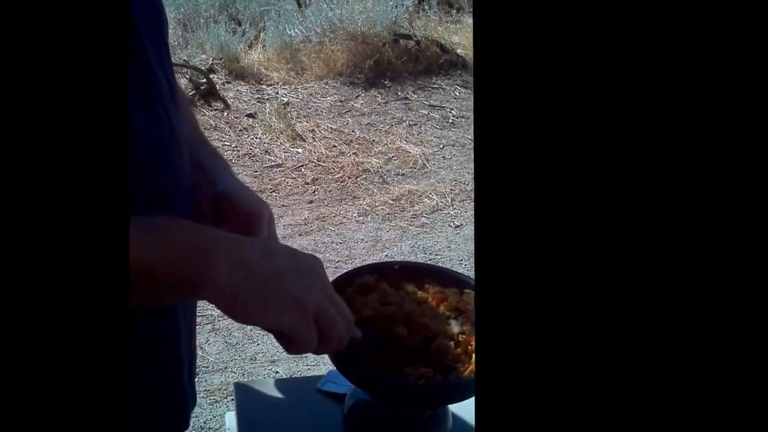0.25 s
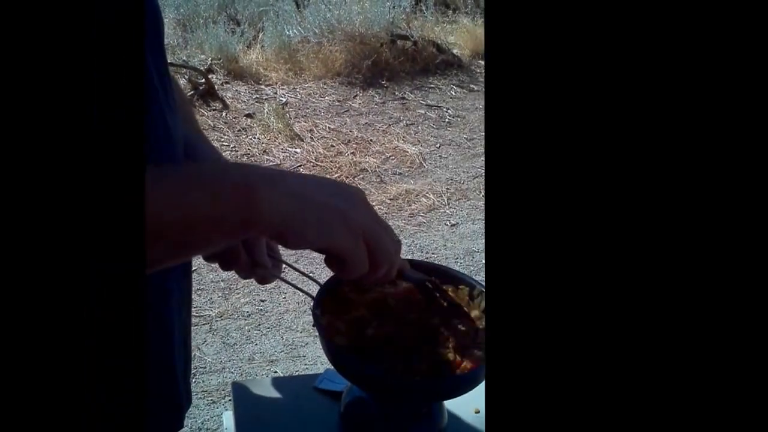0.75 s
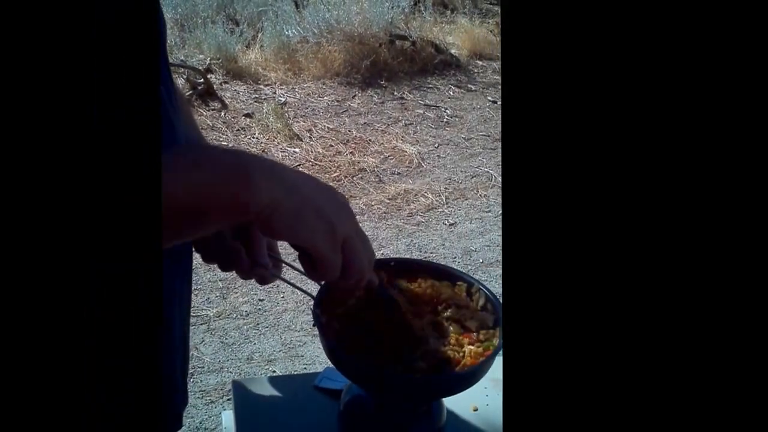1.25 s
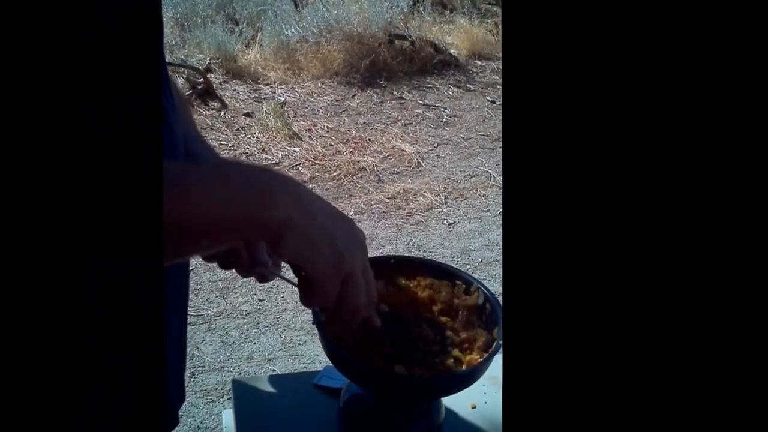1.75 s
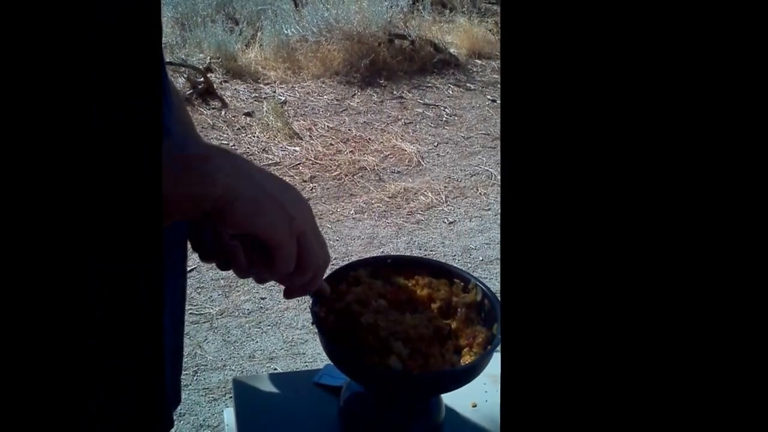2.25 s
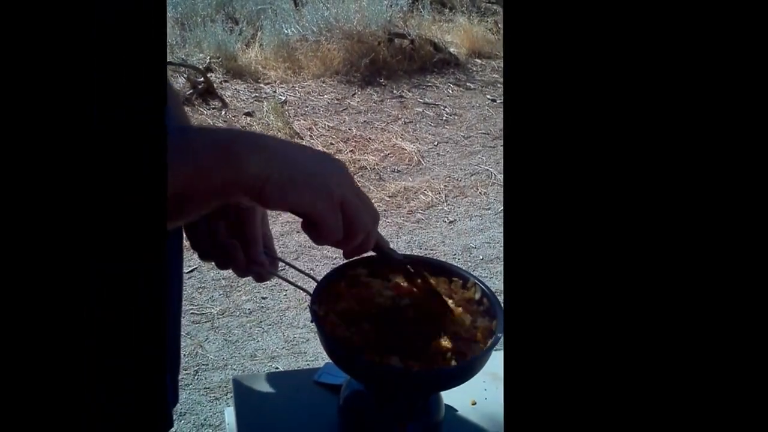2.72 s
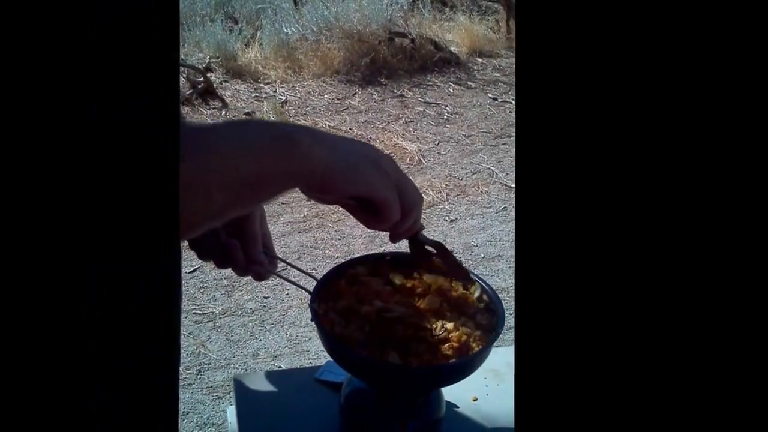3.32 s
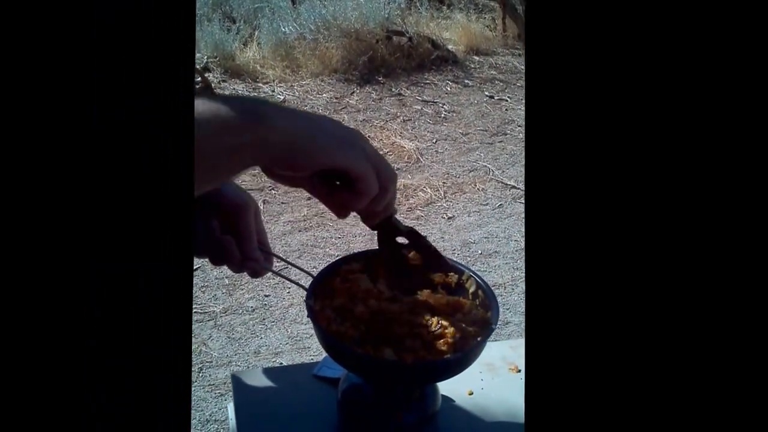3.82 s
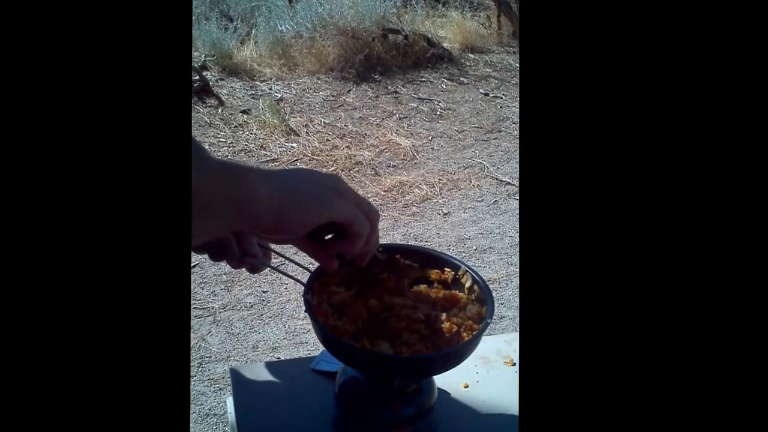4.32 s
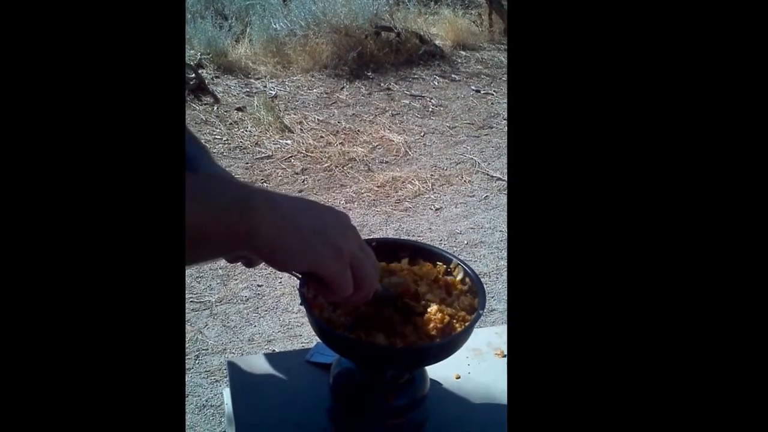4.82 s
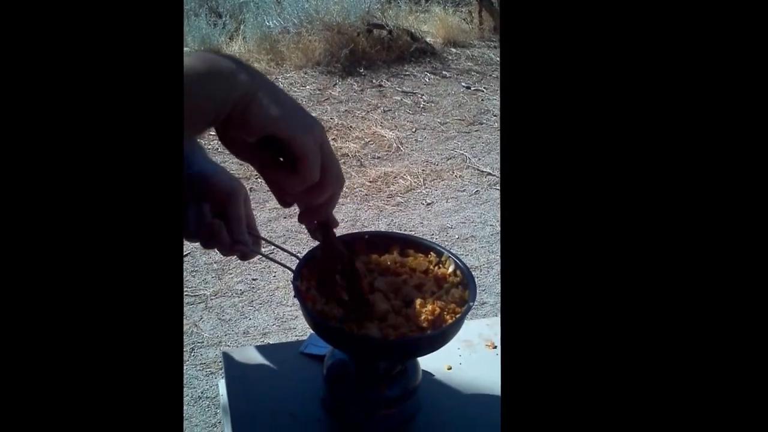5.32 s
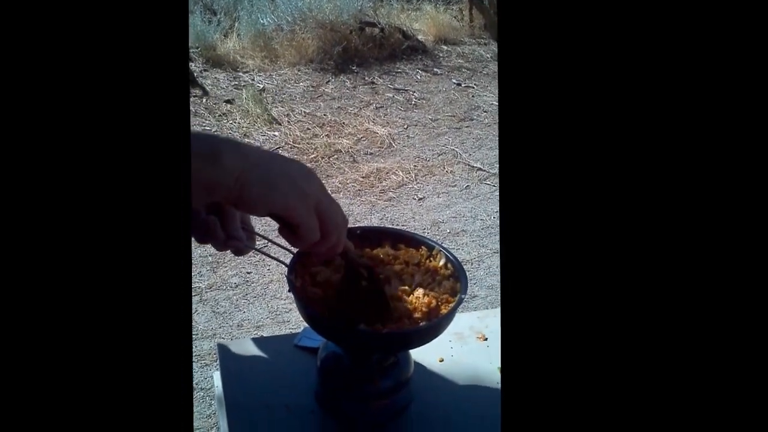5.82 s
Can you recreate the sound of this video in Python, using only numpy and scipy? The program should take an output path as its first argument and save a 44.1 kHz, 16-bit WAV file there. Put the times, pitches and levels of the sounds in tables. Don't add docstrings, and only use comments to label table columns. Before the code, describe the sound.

Throughout about six seconds, a gas camp burner roars steadily under a pan, with airy jet hiss and fine crackling sizzle that waver slightly as food is stirred. Two dull, prominent fat pops come at 0.1 and 0.2 s, then sharp little spits around 0.4-0.9 s. Spoon ticks are short, bright and irregular; knocks on the pan floor fall near 0.9, 1.1, 1.6 and 3.2 s. A quick cluster of ticks comes at 2.6 s, and the hardest knock at 3.6 s leads into a brief rasping scrape. Low wind buffets burst around 1.75 s, 2.2-2.6 s and most densely 2.7-3.4 s, with another near 4.95 s, heavier on one side. Fat spits again around 3.8-4.2 s; crackle grows livelier towards the end, with faint knocks and catches from 5.5 s and a clear tick at 6.0 s. Close, dry outdoor stereo, hollow, comb-like and slightly grainy.

```python
import sys
import numpy as np
from scipy import signal
from scipy.io import wavfile
from scipy.ndimage import uniform_filter1d

SR = 44100
rng = np.random.default_rng(int(sys.argv[2]) if len(sys.argv) > 2 else 0)


def unload_audio(sound):
    columns = np.transpose(np.atleast_2d(sound))
    steps = np.round(np.clip(columns, -1, 1) * 32767)
    wavfile.write(sys.argv[1], SR, steps.astype(np.int16))


def volts_from_decibels(level):
    exponent = np.asarray(level, float) / 20
    return 10 ** exponent


N = 267113


def read(points, hz, order=1):
    columns = np.transpose(points)
    return np.interp(np.log(hz + 1), np.log(columns[0] + 1), columns[order])


def at_time(points, t):
    return np.interp(t, *np.transpose(points))


def evened(x):
    return x / np.sqrt(np.mean(x ** 2) + 1e-20)


def add(mix, s, sound):
    part = mix[max(round(s * SR), 0):][:len(sound)]
    part += sound[:len(part)]


def band(x, hz, width_hz):
    return signal.lfilter(*signal.iirpeak(hz, hz / width_hz, SR), x)


# (time [s], rumble level [dB])
BREEZE = [(0, -64), (.4, -68), (.9, -55.5), (1.3, -56), (1.55, -46), (1.78, -40.5), (1.92, -50),
          (2.3, -46.5), (2.7, -39.5), (3.0, -40.5), (3.4, -41), (3.6, -47.5), (3.9, -52), (4.4, -46),
          (4.95, -50.5), (5.35, -65.5), (5.8, -49.5), (6.06, -56.5)]


def small_eddies(count=150, gap_s=0.04):
    late, size, tone = rng.random((count, 3)).T
    s = (np.arange(count) + 2 * late) * gap_s
    db = at_time(BREEZE, s) + 12.5 + 7 * (size - 0.5)
    hz = 135 + 46 * (tone - 0.5)
    return list(zip(s + 0.04, db, hz))


# (time [s], peak level [dB], frequency [Hz])
BUFFETS = [(1.51, -30, 130), (1.739, -21, 135), (1.751, -16.5, 123), (1.765, -25, 200), (1.825, -20, 167),
           (2.203, -27.5, 144), (2.293, -20, 176), (2.454, -26.5, 135), (2.553, -25, 137),
           (2.709, -23, 175), (2.75, -17.5, 140), (2.839, -26, 147), (2.896, -21, 164), (2.92, -20.4, 134),
           (2.954, -23, 135), (2.976, -23, 150), (3.016, -23.5, 148), (3.062, -21.5, 130),
           (3.138, -15, 171), (3.154, -24.5, 188), (3.168, -18, 140), (3.18, -22, 150), (3.243, -26, 160),
           (3.411, -21, 130), (3.432, -24, 150), (3.613, -28, 161), (4.319, -27.5, 125), (4.68, -26.5, 133),
           (4.928, -28.5, 130), (4.959, -20, 146)]


def wind(lumpy_db=0.5, cycles=0.65, rumble_db=-2.0):
    t = np.arange(N) / SR
    noise, lumps = rng.standard_normal((N, 2)).T
    lumps = evened(uniform_filter1d(uniform_filter1d(lumps, 700), 700))
    rumble = band(band(noise, 120, 170), 150, 260) * volts_from_decibels(lumpy_db * lumps)
    out = evened(rumble) * volts_from_decibels(at_time(BREEZE, t) + rumble_db)

    u = np.arange(-1500, 1500) / SR
    eddies = BUFFETS + small_eddies()
    for (s, db, hz), (turn, wide) in zip(eddies, rng.random((len(eddies), 2))):
        length_s = cycles * (0.51 + 0.87 * wide) / hz
        swell = np.exp(-(u / length_s) ** 2)
        add(out, s + u[0], volts_from_decibels(db) * swell * np.cos(2 * np.pi * (hz * u + turn)))
    return out


def ticks(events, hz, width_hz, t60, gain_db, second):
    out = np.zeros((2, N))
    u = np.arange(600) / SR
    puffs = rng.standard_normal((len(events), 2, len(u) + 1))
    for (s, db), puff in zip(events, puffs):
        tone_hz = hz * (1 + 0.016 * puff[0, 0])
        fading = puff[:, 1:] * volts_from_decibels(-60 * u / t60)
        ring = band(band(fading, tone_hz, width_hz), tone_hz, width_hz)
        ring *= volts_from_decibels(db + gain_db) / abs(ring[0]).max()
        add(out[0], s - 0.001, ring[0])
        add(out[1], s - 0.001, second * ring[0] + 0.47 * ring[1])
    return out


# (time [s], level [dB])
SPOON = [(0.363, -38.4), (0.382, -40.7), (0.472, -40.2), (0.593, -40.4), (0.617, -42.6), (1.295, -39.8),
         (1.473, -38.1), (2.144, -43.1), (2.18, -43.3), (2.629, -34.5), (2.638, -38.1), (2.646, -36.3),
         (2.668, -39.8), (3.033, -36.3), (3.182, -39.4), (3.413, -40.3), (3.635, -35.6), (3.765, -38.7),
         (3.83, -41.9), (3.895, -40.8), (4.07, -41.6), (4.71, -42.4), (4.845, -38.5), (5.124, -45.7),
         (5.566, -40.0), (5.701, -44.1), (5.837, -44.0), (5.893, -40.4), (6.016, -32.3)]


def spoon_ticks():
    return ticks(SPOON, hz=3200, width_hz=1600, t60=0.022, gain_db=0.5, second=-0.25)


# (time [s], level [dB])
KNOCKS = [
    (0.91, -36),
    (1.102, -34.5),
    (1.614, -37),
    (2.333, -64),
    (3.181, -36.5),
    (3.628, -40),
    (3.635, -31),
    (5.501, -43),
    (5.902, -42),
    (6.056, -40),
]


def floor_knocks():
    return ticks(KNOCKS, hz=1575, width_hz=2400, t60=0.058, gain_db=-3.0, second=0.61)


# (time [s], level [dB])
SCRAPES = [
    (1.613, -38),
    (3.66, -38),
    (3.68, -36),
    (3.705, -35),
    (3.713, -40),
    (3.722, -36.5),
    (5.525, -39),
    (5.94, -40.5),
]


def scrapes():
    return ticks(SCRAPES, hz=4260, width_hz=1700, t60=0.018, gain_db=0.1, second=0.22)


# (time [s], level [dB])
SPITS = [(0.015, -53), (0.027, -46), (0.43, -36), (0.529, -35), (0.713, -56), (0.786, -39), (0.854, -33.5),
         (0.902, -38.5), (1.265, -55), (2.04, -42), (2.321, -51), (2.364, -36), (3.765, -38),
         (3.895, -36.5), (3.963, -36), (4.202, -36), (5.491, -43), (5.827, -37), (5.843, -39), (5.909, -36)]


def fat_spits():
    return ticks(SPITS, hz=8300, width_hz=11000, t60=0.02, gain_db=-3, second=0.3)


# (time [s], level [dB])
POPS = [
    (.125, -27),
    (.211, -29.5),
]


def fat_pops():
    return ticks(POPS, hz=5600, width_hz=5000, t60=0.012, gain_db=0, second=0.25)


def crackle(per_s, spread_db):
    size = volts_from_decibels(spread_db * np.minimum(rng.exponential(1, N), 4))
    happens = rng.random(N) < per_s / SR
    return evened(size * rng.standard_normal(N) * happens)


def grainy_noise(grain=0.16):
    smooth = rng.standard_normal((2, N))
    grains = np.array([crackle(per_s=2000, spread_db=3.5), crackle(per_s=2000, spread_db=3.5)])
    hz, t, rush = signal.stft(smooth, SR, nperseg=1024, noverlap=768)
    bursts = signal.stft(grains, SR, nperseg=1024, noverlap=768)[2]
    share = np.clip(grain * np.sqrt(hz / 9000), 0, 0.9)[:, None]
    return hz, t, np.sqrt(1 - share) * rush + np.sqrt(share) * bursts


STOVE_HZ = (800, 2600, 4800, 6000, 7800, 9500)
# (time [s], stirring level [dB])
STIRRING = [(0, 2.5), (.125, 7), (.3, 2), (.55, .5), (1.3, .3), (1.6, 1), (1.875, 2), (2.05, -2.5),
            (2.375, 1.5), (2.5, -0.5), (3.3, 1), (3.68, 5), (3.875, -0.5), (4.375, 3.5), (4.65, -0.2),
            (5.2, -3), (5.65, -1), (6.06, -0.5)]
# (time [s], exposure level [dB])
EXPOSURE = [(0, 1.5), (.625, 1.5), (1, -0.5), (1.375, 0.5), (1.5, 2.5), (2.3, 1), (2.55, 0), (3, 1.5),
            (3.125, 3), (3.26, -0.5), (3.5, 3.5), (3.75, 0.5), (3.875, -1.5), (4.4, 0.4), (4.85, -4.5),
            (5.2, 0), (5.5, -4), (5.8, -2)]
# (time [s], level [dB])
FAT = [
    (0, -2),
    (.4, 0.5),
    (2, -0.5),
    (3, 1),
    (3.9, 1),
    (4.4, 0.5),
    (4.8, 2),
    (5.5, 2.5),
    (5.7, 2),
    (6.06, 3.5),
]


def stove_level_db(hz, t, patchy_db=1.5, flicker_db=0.5, flutter_db=0.65):
    flutter = evened(uniform_filter1d(rng.standard_normal(N), round(0.14 * SR)))
    sizzle = at_time(STIRRING, t)
    jet = at_time(EXPOSURE, t) + flutter_db * np.interp(t, np.arange(N) / SR, flutter)
    roar = 0.16 * sizzle
    fat = 0.61 * sizzle + 0.66 * jet + at_time(FAT, t)
    layers = np.transpose([roar, sizzle, sizzle, jet, jet, fat])
    level_db = np.transpose([np.interp(hz, STOVE_HZ, row) for row in layers])

    chance = rng.standard_normal((len(t), len(hz) + 1)).T
    patches = evened(uniform_filter1d(uniform_filter1d(chance[1:], 16, 0), 9, 1))
    flicker = evened(uniform_filter1d(chance[0], 4))
    restless = np.sqrt(hz / 5000)[:, None]
    return level_db + restless * (patchy_db * patches + flicker_db * flicker)


# (frequency [Hz], level [dB per Hz])
COMMON = [(70, -81), (200, -71.5), (370, -66.5), (470, -74), (640, -86), (850, -80.5), (1250, -89.5),
          (1600, -92.5), (2400, -87), (3600, -95.5), (4600, -94.5), (9900, -102.8), (13000, -104.8),
          (14000, -107.9)]
# (frequency [Hz], level [dB per Hz])
DIFFERENCE = [(60, -80), (130, -91.5), (230, -94), (350, -94.5), (600, -81), (950, -93.5), (1250, -86),
              (2000, -90), (3000, -92.5), (3700, -95), (5500, -97.5), (9000, -99), (12000, -101.2),
              (14100, -109.7)]
# (frequency [Hz], in step [share], a quarter turn ahead [share])
LIKENESS = [(150, 0.64, -0.08), (259, 0.35, -0.18), (375, 0.034, -0.3), (555, -1.2, 0.55),
            (654, 0.34, 0.56), (800, 0.15, -0.26), (980, -0.037, 0.27), (1120, -1.4, 0.5), (1855, -1, 0.23),
            (2460, 0.92, 0.87), (3585, 0.28, -0.41), (3750, 0.64, -0.28), (5270, -0.15, 0.016),
            (9600, 0.079, 0.055)]
# (frequency [Hz], width [Hz], level [dB])
CAVITY = (1615, 168, 7)


def stove():
    hz, t, z = grainy_noise()
    like = read(LIKENESS, hz) - 1j * read(LIKENESS, hz, order=2)
    like = np.conj(like / np.maximum(abs(like) / 0.98, 1))[:, None]
    cavity_hz, width_hz, cavity_db = CAVITY
    ridge_db = cavity_db * np.exp(-((hz - cavity_hz) / width_hz) ** 2)

    common = z[0] * volts_from_decibels(read(COMMON, hz) + ridge_db)[:, None]
    partly_alike = like * z[0] + np.sqrt(1 - abs(like) ** 2) * z[1]
    difference = partly_alike * volts_from_decibels(read(DIFFERENCE, hz))[:, None]
    ports = np.array([common + difference, common - difference])
    ports = ports * volts_from_decibels(stove_level_db(hz, t)) * np.sqrt(SR / 2)
    return signal.istft(ports, SR, nperseg=1024, noverlap=768)[1][:, :N]


def scene():
    breeze = wind() * np.array([[1], [0.08]])
    pan = spoon_ticks() + floor_knocks() + scrapes() + fat_spits() + fat_pops()
    return breeze + pan + stove()


# (frequency [Hz], level [dB])
COARSE = [(300, -20), (1200, -9), (3000, -4), (5200, -3.5), (7000, -6), (9000, -1.5), (11500, -3),
          (13300, 2.5), (14100, 3.5), (14700, 10), (15300, 30)]
SPARED = (0.125, 0.211, 3.88)
EDGES = np.r_[0:40:4, 40:96:8, 96:144:12, 144, 160, 176, 196, 216, 240, 264, 292, 320:1024:32]


def rounded_spectrum(stereo, wander_db=1.8, spared_db=-8.0, empty_db=-7.0, rounding=0.38, steady=0.4):
    size, grid = 1024, 196
    pair = np.array([stereo[0] + stereo[1], stereo[0] - stereo[1]]) / 2
    pair = np.pad(pair, ((0, 0), (2 * size - grid, 3 * size)))
    n, k = np.arange(2 * size)[:, None], np.arange(size)
    window = signal.windows.kaiser_bessel_derived(2 * size, 2 * 2 * np.pi)[:, None]
    basis = window * np.sqrt(2 / size) * np.cos(np.pi / size * (n + 0.5 + size / 2) * (k + 0.5))
    frames = np.lib.stride_tricks.sliding_window_view(pair, 2 * size, axis=1)[:, ::size].copy()
    lines = frames @ basis

    widths = np.diff(np.r_[EDGES, size])
    power = np.add.reduceat(lines ** 2, EDGES, axis=2) / widths
    wander = evened(uniform_filter1d(rng.standard_normal(power.shape), size=3, axis=1))
    step_db = read(COARSE, (EDGES + widths / 2) * SR / 2 / size) + wander_db * wander
    attack = (np.array(SPARED) * SR - grid).astype(int) // size
    step_db[:, attack + np.array([[1], [2]])] += spared_db
    both = power.sum(0) + 1e-20
    step = volts_from_decibels(step_db) * np.sqrt(both * (np.median(both, 0) / both) ** steady)

    kept = np.repeat(np.sqrt(power) > volts_from_decibels(empty_db) * step, widths, axis=2)
    step = np.repeat(step, widths, axis=2)
    rounded = kept * np.sign(lines) * np.floor(abs(lines) / step + rounding) * step
    halves = (rounded @ basis.T).reshape(2, -1, 2, size)
    joined = (halves[:, 1:, 0] + halves[:, :-1, 1]).reshape(2, -1)
    mid, side = joined[:, size - grid:][:, :N]
    return np.array([mid + side, mid - side])


# (frequency [Hz], width [Hz], level [dB])
PORT = (6772, 596, 17.08)


def port_difference(dry):
    hz, width_hz, db = PORT
    rung = band(band(dry[1], hz, 2.87 * width_hz), hz, 1.6 * width_hz)
    ports = np.array([dry[0], dry[1] + volts_from_decibels(db) * rung])
    ports = signal.lfilter(*signal.butter(2, 80, "high", fs=SR), ports)
    late = np.pad(ports[::-1], ((0, 0), (15, 0)))[:, :N]
    return ports - late


def band_limit(x):
    return signal.sosfilt(signal.butter(12, 14840, fs=SR, output="sos"), x)


def record(dry):
    mix = rounded_spectrum(port_difference(dry))
    return band_limit(mix)


dry = scene()
out = record(dry)
unload_audio(out)
```